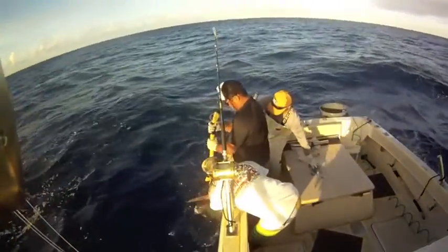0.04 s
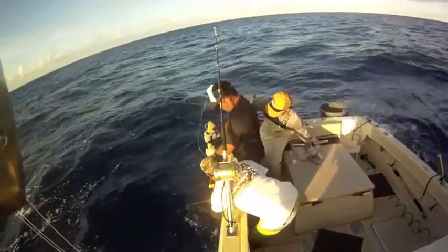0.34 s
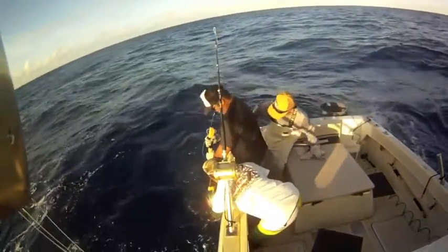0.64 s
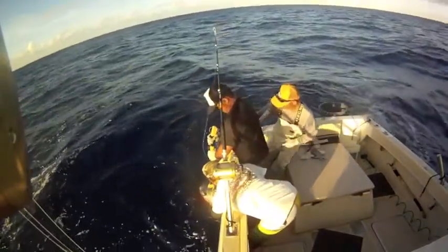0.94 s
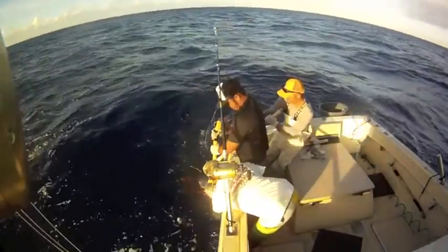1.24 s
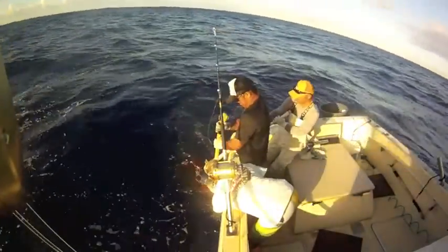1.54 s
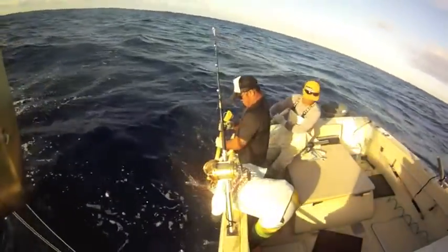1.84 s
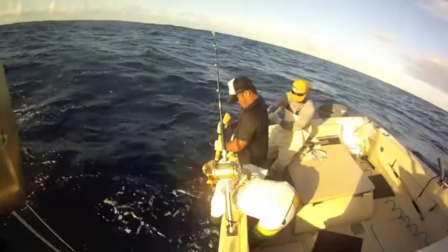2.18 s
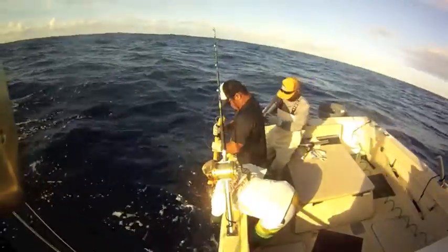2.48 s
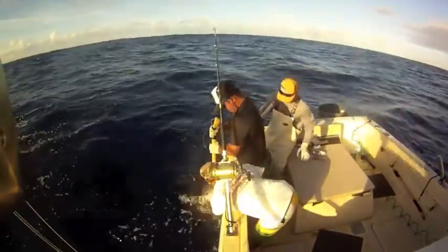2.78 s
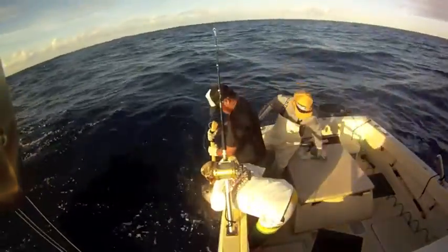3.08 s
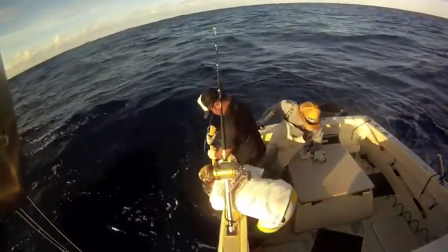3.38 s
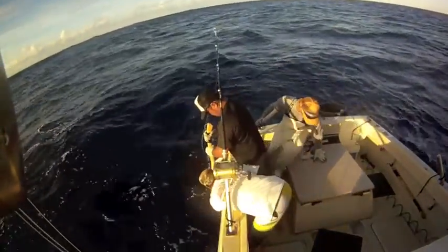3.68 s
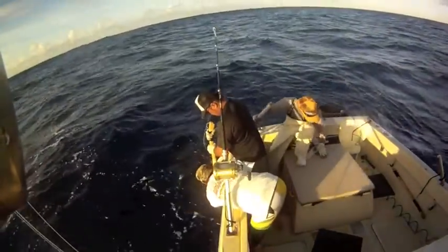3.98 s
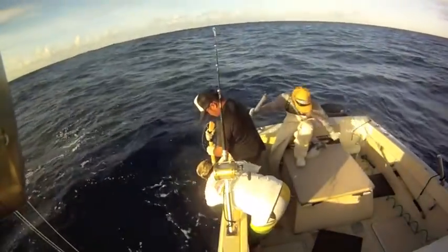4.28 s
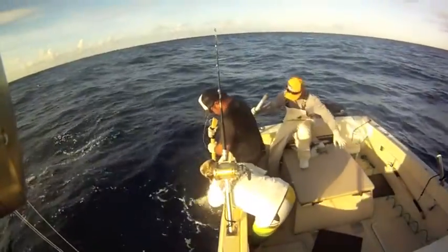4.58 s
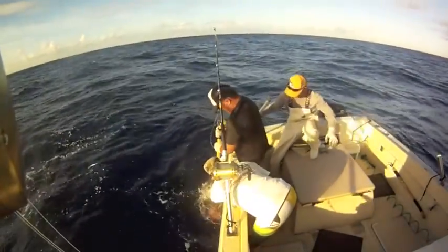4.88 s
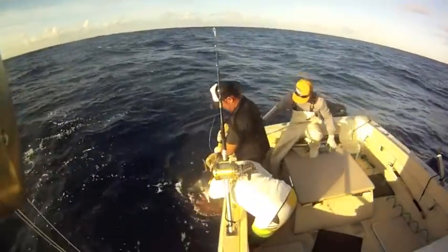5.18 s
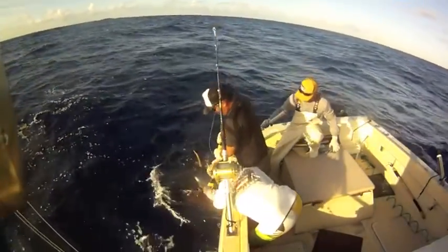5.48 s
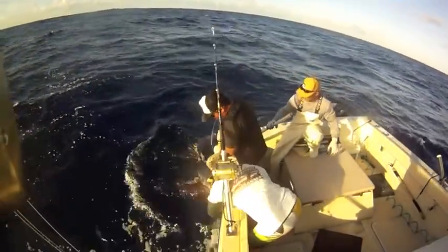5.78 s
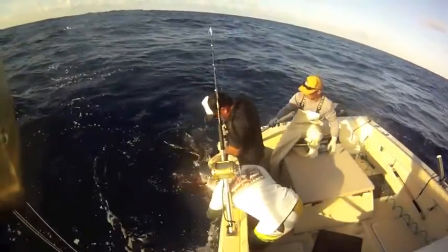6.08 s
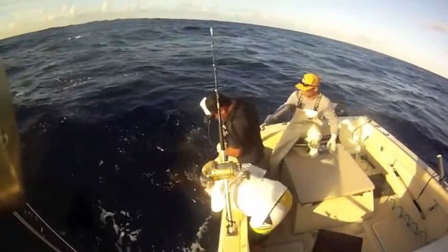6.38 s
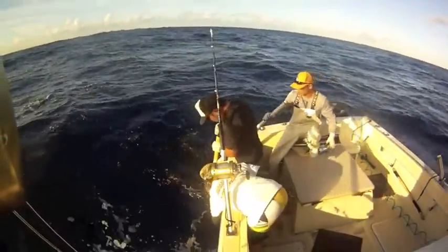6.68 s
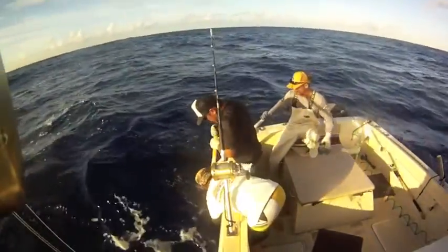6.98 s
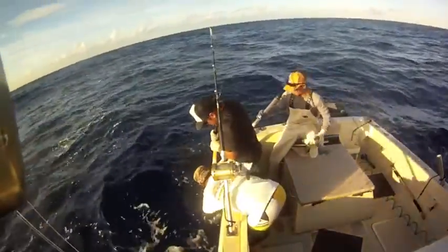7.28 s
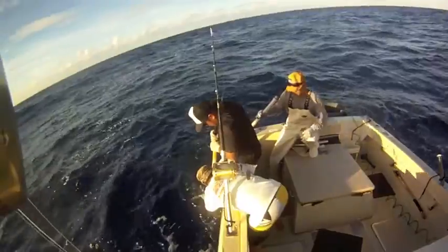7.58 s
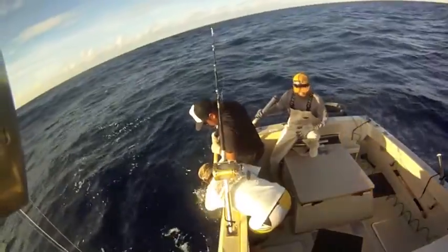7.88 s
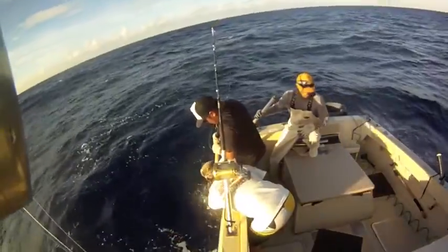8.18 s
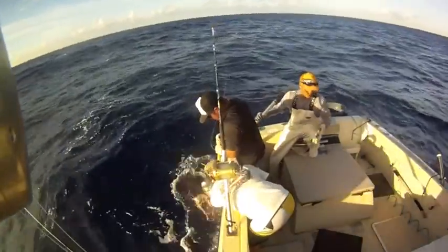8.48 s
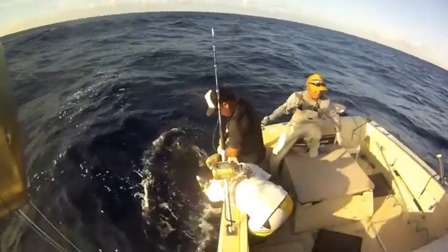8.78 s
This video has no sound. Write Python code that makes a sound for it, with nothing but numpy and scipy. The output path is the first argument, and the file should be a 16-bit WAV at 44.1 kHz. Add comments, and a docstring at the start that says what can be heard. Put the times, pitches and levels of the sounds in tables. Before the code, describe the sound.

Heard through a sealed housing, water washes against a boat over the low, steady throb of its diesel. The housing clacks on its mount several times at the start, and a fishing reel gives a short ratcheting run. Waves keep thumping the hull and throwing bits of spray, a few hard knocks stand out later, and more slaps come at the end. The sound is muffled, with thin treble.

```python
"""On open water, a six-cylinder boat diesel throbs at low speed, heard by a camera in a sealed housing.
The swell sways the engine's speed. Water washes and slaps along the hull, foam hisses, spray patters,
a fishing reel ticks and the housing knocks on its mount. The camera samples slowly and holds each
sample, which mirrors the sound into a thin treble."""
import sys
import numpy as np
from scipy import signal
from scipy.fft import rfft, irfft, next_fast_len
from scipy.io import wavfile
from scipy.ndimage import map_coordinates

SR = 44100
rng = np.random.default_rng(int(sys.argv[2]) if len(sys.argv) > 2 else 0)


def to_wav(sig):
    """Store sig (one row per channel, or 1-D mono) as 16-bit WAV at the path in sys.argv[1].

    Samples outside -1..1 are clipped; the rate is SR.
    """
    pcm = np.clip(np.atleast_2d(sig), -1, 1) * 32767
    pcm = np.round(pcm).astype(np.int16)
    wavfile.write(sys.argv[1], SR, pcm.T)  # frames by channels


N = 389844
TIME = np.arange(N) / SR
HIT_TIME = np.arange(SR // 6) / SR

# water running along the hull: t/s, level/dB
WASH_ENVELOPE = [(0.0, -47), (0.2, -50.5), (0.3, -43), (0.6, -48), (1.3, -44.5), (1.5, -43), (1.6, -42),
                 (2.5, -48), (3.2, -44), (4.0, -49.5), (5.6, -49.5), (5.9, -42.5), (6.2, -46.5),
                 (7.2, -48.5), (8.7, -45.5), (8.8, -44)]
# water heard through the housing: f/Hz, density/dB
WASH_SPECTRUM = [(200, -22), (370, -21), (440, -4), (485, 3), (530, -3), (595, 0), (690, -17.5),
                 (820, -5.5), (935, -15.5), (1020, -10.5), (1150, -23.5), (1500, -24.5), (2200, -53)]
# housing resonances: f/Hz, level/dB, t60/s
HOUSING_MODES = [(489.7, -5.5, 0.057), (586, -5, 0.042), (817.5, 1, 0.035), (1013, 2.5, 0.028),
                 (1195, -4, 0.03), (1489, -7.5, 0.035), (1605, -10.5, 0.031), (1937, -1.5, 0.025),
                 (2400, -5.5, 0.016), (2488, -7.5, 0.024), (3570, -4.5, 0.017)]


def amp(db):
    """Decibels to gain."""
    return 10 ** (np.asarray(db) / 20)


def unit(x):
    """Scale to rms 1."""
    return x / np.sqrt(np.mean(x ** 2) + 1e-20)


def unit_peak(x):
    """Scale to peak 1."""
    return x / (np.abs(x).max() + 1e-20)


def curves(rows):
    """Per-sample curve for each column after the time."""
    times_s, *columns = np.transpose(rows)
    return [np.interp(TIME, times_s, column) for column in columns]


def wobble(rate_hz):
    """Smooth random curve, rate_hz knots a second."""
    return map_coordinates(rng.standard_normal(int(N * rate_hz / SR) + 4), [TIME * rate_hz])


def filtered(x, response):
    """Apply a gain given as a function of f/Hz."""
    size = next_fast_len(len(x) + 8192)
    return irfft(rfft(x, size) * response(np.fft.rfftfreq(size, 1 / SR)), size)[:len(x)]


def coloured(x, spectrum):
    """Shape x by (f/Hz, density/dB) points on a log axis; rms 1."""
    points_hz, db = np.transpose(spectrum)
    return unit(filtered(x, lambda hz: amp(np.interp(np.log(hz + 1), np.log(points_hz), db))))


def add(track, start_s, sound):
    """Mix a sound into the track."""
    part = track[max(round(start_s * SR), 0):][:len(sound)]
    part += sound[:len(part)]


def ring(modes, tilt_db_oct, scatter_db):
    """Damped modes of alternating sign, at new strengths for each blow."""
    hz, db, t60_s = np.transpose(modes)[:, :, None]
    level_db = db + tilt_db_oct * np.log2(hz / hz[0]) + scatter_db * rng.standard_normal(hz.shape)
    sign = (-1) ** np.arange(len(hz))[:, None]
    decay = amp(level_db - 60 * HIT_TIME / t60_s)
    return np.sum(sign * decay * np.sin(2 * np.pi * hz * HIT_TIME), axis=0)


def pulse(rise_s):
    """Envelope that peaks at rise_s and dies away."""
    age = HIT_TIME / max(rise_s, 1e-4)
    return age * np.exp(1 - age)


def burst(spectrum, rise_s):
    """Pulse of coloured noise; peak 1."""
    return unit_peak(coloured(rng.standard_normal(len(HIT_TIME)), spectrum) * pulse(rise_s))


def drops(spread_db, count):
    """Randomly timed impulses of unequal size; rms 1."""
    sizes = amp(spread_db * rng.standard_normal(count)) * rng.choice([-1, 1], count)
    return unit(np.bincount(rng.integers(0, N, count), sizes, N))


def shell(x):
    """The stiff housing passes little below its lowest mode."""
    return signal.sosfilt(signal.butter(2, 350, "highpass", fs=SR, output="sos"), x)


def cycle_angle():
    """Engine cycle angle/rad, six firings a turn; the swell loads and frees the propeller."""
    firing_hz, throb_at_s = 31.3, 6.057
    swell_s, crest_at_s, speed_sway = 2.35, 1.25, 0.012
    sway_s = speed_sway * swell_s / (2 * np.pi) * np.cos(2 * np.pi * (TIME - crest_at_s) / swell_s)
    return 2 * np.pi * firing_hz / 6 * (TIME + sway_s - throb_at_s)


def foam():
    """Foam hisses beside the boat; a fine fizz follows its level."""
    # foam: t/s, level/dB
    foam_envelope = [(0.0, -53), (0.3, -55.5), (0.5, -58), (1.1, -51), (2.4, -56), (3.1, -55), (3.4, -51.5),
                     (4.0, -54), (4.3, -58.5), (4.8, -51), (5.0, -57.0), (5.7, -54), (5.8, -53.0),
                     (6.5, -56.5), (6.6, -50.5), (6.7, -58.5), (7.3, -58.5), (7.6, -57.5), (8.2, -56),
                     (8.8, -48.5)]
    # hiss and fizz: f/Hz, density/dB
    hiss_spectrum = [(500, -12), (1100, -5.5), (1330, -5), (1520, 1), (1720, -4), (1950, 0), (2200, 0.5),
                     (2450, 7), (2700, 0.5), (3000, -10), (3500, -32), (6000, -56)]
    fizz_spectrum = [(1500, -18), (2900, -15), (3200, 0), (3550, 3), (4100, -11), (5300, -12), (6000, -24)]
    foam_db, = curves(foam_envelope)
    hiss = amp(foam_db + 0.76 * wobble(17)) * coloured(rng.standard_normal(N), hiss_spectrum)
    fizz_db = -67.5 + 1.1 * (foam_db - foam_db.mean()) + 2 * wobble(25)
    crackle = rng.standard_normal(N) + 0.27 * drops(spread_db=9, count=7000)
    return hiss + amp(fizz_db) * coloured(crackle, fizz_spectrum)


def wash():
    """Water gurgles through the housing's resonances, pulsing at the firing rate."""
    wash_db, = curves(WASH_ENVELOPE)
    flow = rng.standard_normal(N) + 0.45 * drops(spread_db=4.5, count=1500)
    chatter = 1 + 0.2 * np.cos(6 * cycle_angle())
    gurgle = flow * chatter * amp(1.92 * wobble(14))
    return amp(wash_db + 1.5) * coloured(gurgle, WASH_SPECTRUM)


def rumble():
    """The hull rumbles with the wash and surges when a wave shoves it."""
    # hull rumble: f/Hz, density/dB
    spectrum = [(12, -26), (30, -2), (50, -2.5), (72, 3), (86, -1), (110, -1.5), (150, -6.5), (170, -13.5),
                (200, -8.5), (235, -12.5), (272, -5), (310, -22), (420, -14.5), (900, -75)]
    # wave shoves: t/s, level/dB, half width/s
    shoves = [(1.03, -41, 0.069), (1.214, -44.5, 0.083), (1.493, -41, 0.043), (3.473, -40, 0.028),
              (4.33, -49, 0.044), (5.873, -34.5, 0.03), (6.026, -39.5, .07), (8.33, -41, .03),
              (8.79, -38, 0.024)]
    wash_db, = curves(WASH_ENVELOPE)
    steady = amp(-47 + 0.42 * (wash_db - wash_db.mean()) + 1.2 * wobble(12))
    surge = sum(amp(db) * np.exp(-0.5 * ((TIME - at_s) / half_s) ** 2) for at_s, db, half_s in shoves)
    return np.hypot(steady, surge) * coloured(rng.standard_normal(N), spectrum)


def sprays():
    """Handfuls of water land with a short hiss, the finest drops brightest."""
    # spray landings: t/s, peak/dB, length/s, tilt/(dB/octave)
    landings = [(.622, -40, 0.0068, 2), (1.169, -29, 0.0058, -7), (1.997, -34.5, 0.021, -4.5),
                (2.505, -34, 0.02, -3), (3.46, -30.5, 0.0077, -14), (4.361, -36.5, 0.0065, -6.5),
                (4.405, -32.5, 0.013, -3), (4.708, -39.5, .025, 3), (4.862, -26, .017, -2),
                (5.278, -35.5, 0.013, -2), (5.532, -35.5, 0.0063, 12), (6.625, -33, 0.02, -5.5),
                (7.029, -41.5, 0.0081, 3), (7.615, -38.5, 0.018, -6), (8.69, -42, 0.12, 6)]
    # spray hiss: f/Hz, density/dB
    spectrum = [(500, -13), (1000, 7), (1500, 4), (1750, 3), (2400, 17), (3000, 2), (3600, 12.5),
                (4400, -6), (5400, -6), (6000, -8)]
    out = np.zeros(N)
    for at_s, peak_db, length_s, tilt_db_oct in landings:
        tilted = [(hz, db + tilt_db_oct * np.log2(hz / 3000)) for hz, db in spectrum]
        add(out, at_s, amp(peak_db) * burst(tilted, rise_s=length_s / 2))
    return out


def reel():
    """Line pulls the ratchet past the pawl: an uneven dry scrape and short ring per tooth."""
    # line pulled off the reel: start/s, end/s
    pulls = [(1.955, 2.37), (2.445, 2.5), (2.625, 2.86)]
    # hard snaps over a tooth: t/s, peak/dB, length/s
    snaps = [(1.941, -32, 0.0071), (2.129, -34, .005), (2.233, -27.5, 0.0062), (2.823, -37.5, 0.0038)]
    # pawl scrape: f/Hz, density/dB
    scrape_spectrum = [(700, -33), (1300, 17.5), (1800, 3), (2500, -2), (3600, 14.5), (4400, -4.5),
                       (5300, -7), (6000, -2.5)]
    # pawl ring: f/Hz, level/dB, t60/s
    pawl_modes = [(3060, 4.5, 0.0038), (3470, 4.5, 0.0083), (3660, -0.5, 0.0073), (4270, -7, 0.0046),
                  (5120, -2, 0.006)]
    tooth_hz, tooth_db, spread_db, tooth_s = 48, -42.5, 2.5, 0.00062
    times_s = np.concatenate([np.arange(start_s, end_s, 1 / tooth_hz) for start_s, end_s in pulls])
    jitter = rng.standard_normal((len(times_s), 2))
    teeth = [(at_s + 0.25 * late / tooth_hz, tooth_db + spread_db * size, tooth_s)
             for at_s, (late, size) in zip(times_s, jitter)]
    out = np.zeros(N)
    for at_s, peak_db, length_s in [*snaps, *teeth]:
        scrape = burst(scrape_spectrum, rise_s=length_s / 2)
        detune = np.exp(0.037 * rng.standard_normal())
        pawl = ring(np.array(pawl_modes) * [detune, 1, 1], tilt_db_oct=1, scatter_db=1.5)
        ping = unit_peak(signal.fftconvolve(scrape, pawl)[:len(HIT_TIME)])
        add(out, at_s, amp(peak_db) * unit_peak(0.7 * ping + scrape))
    return out


def slaps():
    """A wave's soft push booms in housing and hull and traps air; sharper slaps throw more spray."""
    # wave slaps: t/s, level/dB, sharpness/dB, air gulp re boom/dB, hull panel re boom/dB
    waves = [(.372, -23, -4, -5, -23), (1.053, -30, -9, -2, -15), (1.171, -19.5, -20, -6, -23),
             (1.478, -23, -25, -8.5, -7.5), (1.534, -28.5, -16, -5, -17), (2.055, -27, -3.5, -3, -10),
             (2.366, -31.5, -22, -2, -30), (2.604, -33.5, -1, -23, -22), (3.476, -32, -8, 4.5, -15),
             (4.139, -22.5, -12.5, -16, -30), (5.865, -23.5, -5, -16, -16), (5.914, -21.5, -13, -13, -14),
             (6.065, -27.5, 1.5, -28, -28), (6.663, -32.5, -7, -28, -30), (7.093, -38, -29, -4, -25),
             (8.334, -25, -4.5, -1.5, -30), (8.459, -31, -5, 3.5, -25), (8.763, -18.5, -8, -6.5, -35),
             (8.819, -20.5, -9, -23, -19)]
    # hull panel: f/Hz, level/dB, t60/s
    panel_modes = [(186, -7, 0.1), (220, 5, 0.12), (265.6, 2, 0.15)]
    # thrown spray: f/Hz, density/dB
    splash_spectrum = [(500, -14), (1000, 2), (1500, 16), (1750, -1), (2400, 10.5), (3000, -3.5),
                       (3600, -14), (4400, -19), (5400, -14), (6000, -55)]
    push = (1 - np.exp(-HIT_TIME / 0.0034)) ** 2
    out = np.zeros(N)
    for at_s, level_db, sharp_db, gulp_db, panel_db in waves:
        housing = ring(HOUSING_MODES, tilt_db_oct=0.95 * sharp_db - 2.5, scatter_db=0.5)
        boom = unit_peak(shell(push * housing))
        panel = amp(panel_db) * unit_peak(push * ring(panel_modes, tilt_db_oct=9, scatter_db=4))
        churn = 0.41 * burst(WASH_SPECTRUM, rise_s=0.011)
        splash = amp(sharp_db - 3) * burst(splash_spectrum, rise_s=0.0048)
        # the air pocket rises in pitch as it nears the surface
        gulp_hz = 470 * np.exp(0.033 * rng.standard_normal()) * (1 + 0.82 * HIT_TIME)
        gulp = amp(gulp_db) * pulse(rise_s=0.0076) * np.sin(2 * np.pi * np.cumsum(gulp_hz) / SR)
        add(out, at_s, amp(level_db) * (boom + panel + churn + splash + gulp))
    return out


def knocks():
    """The housing hits its mount: a hard contact, then a softer one; harder knocks are brighter."""
    # knocks on the mount: t/s, peak/dB, rebound count
    impacts = [(0.276, -15, 0), (0.306, -11, 1), (0.506, -23.5, 1), (1.34, -17, 0), (1.383, -24.5, 0),
               (1.415, -21, 0), (1.441, -17.5, 0), (1.569, -14.5, 0), (1.795, -20, 1), (2.962, -25, 0),
               (2.991, -22, 0), (3.081, -16, 2), (3.941, -26.5, 0), (5.917, -18.5, 1), (6.557, -8.5, 0),
               (6.908, -11, 0), (7.591, -10.5, 0), (7.844, -27.5, 0), (8.003, -27, 0), (8.07, -27, 0)]
    rebound_s, rebound_db = 0.033, -26.5  # the next firings rattle it again
    hard_knock_db, second_contact_s = -7.5, 0.004826
    blows = [(at_s, peak_db) for at_s, peak_db, _ in impacts]
    rebounds = [(at_s + (k + 1) * rebound_s, rebound_db + 0.5 * k)
                for at_s, _, count in impacts for k in range(round(count))]
    attack = 1 - np.exp(-HIT_TIME / 0.00039)
    out = np.zeros(N)
    for at_s, peak_db in blows + rebounds:
        tilt_db_oct = 0.77 * (peak_db - hard_knock_db)
        knock = unit_peak(attack * ring(HOUSING_MODES, tilt_db_oct, scatter_db=1.5))
        second = unit_peak(ring(HOUSING_MODES, tilt_db_oct - 6.5, scatter_db=5.5))
        add(knock, second_contact_s, 0.57 * second)
        add(out, at_s, amp(peak_db) * unit_peak(shell(knock)))
    return out


def engine():
    """Uneven cylinders add order 5, beating with firing order 6 once a cycle; the hull shudders along."""
    # engine shake: t/s, firing order/dB, uneven-cylinder order/dB
    shake = [(0.0, -24, -36.0), (0.2, -20.5, -25.5), (0.9, -34, -52), (1.2, -25.5, -35), (1.7, -27.5, -34),
             (3.0, -25.5, -35), (3.7, -31.5, -23), (3.9, -27, -42), (4.1, -35.5, -24), (4.4, -25.0, -44),
             (4.6, -25.5, -21.5), (5.1, -25.0, -39.5), (6.0, -28, -25), (6.2, -22.5, -34), (7.7, -28, -26),
             (7.9, -31, -46), (8.3, -32.5, -37), (8.8, -25.5, -37.5)]
    # weaker orders: multiple of the cycle rate, level/dB
    weak_orders = [(4, -48), (7, -64.5), (12, -54), (13, -61.5), (14, -55), (18, -60), (24, -70), (28, -59)]
    # the hull's irregular response: f/Hz, density/dB
    shudder_spectrum = [(14, -1), (22, 20.5), (28, 15), (34, 14), (42, -13), (60, -44.5)]
    firing_db, uneven_db = curves(shake)
    angle = cycle_angle()
    firing = amp(firing_db) * np.cos(6 * angle)
    uneven = amp(uneven_db) * np.cos(5 * angle)
    weak = sum(amp(db + 0.82 * wobble(9.5)) * np.cos(order * angle + 1.4 * wobble(2.947))
               for order, db in weak_orders)
    shudder = amp(-35) * coloured(rng.standard_normal(N), shudder_spectrum)
    return np.sqrt(2) * (firing + uneven + weak) + shudder


def scene():
    """Mono mix; open water gives no echo."""
    return (engine() + rumble() + wash() + foam() + knocks() + slaps() + sprays() + reel())[None]


def record(dry):
    """Sample-and-hold mirrors the band around the hold rate, weakest for the lowest notes."""
    hold_hz, top_hz = 12000, 15500
    nyquist_hz = hold_hz / 2
    band = filtered(dry[0], lambda hz: np.clip((nyquist_hz - hz) / 500, 0.05, 1) * (hz < nyquist_hz))
    sidebands = 2 * band * np.cos(2 * np.pi * hold_hz * TIME)
    mirror = filtered(sidebands, lambda hz: np.abs(hz - hold_hz) / np.maximum(hz, nyquist_hz))
    return filtered(band + amp(0.4) * mirror, lambda hz: np.clip((top_hz - hz) / 600, 0, 1))[None]


dry = scene()
out = record(dry)
to_wav(out)
```